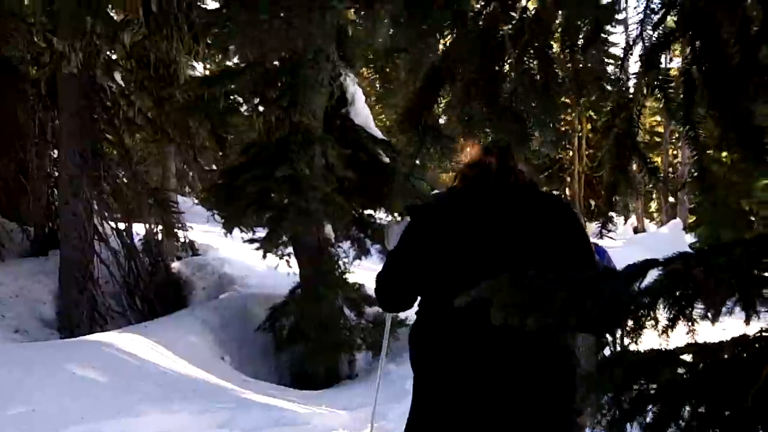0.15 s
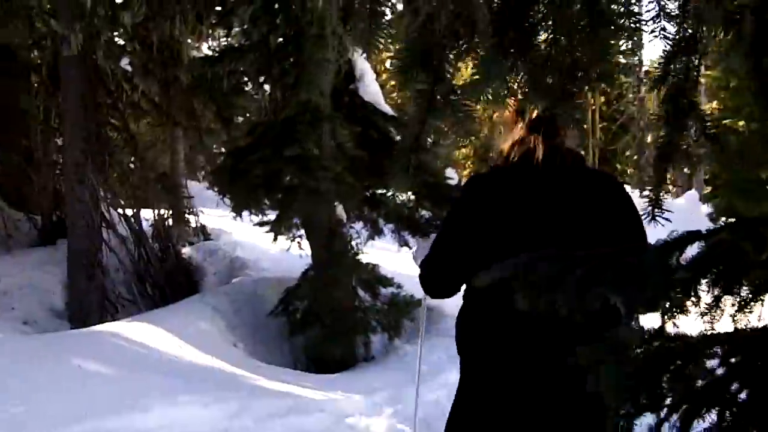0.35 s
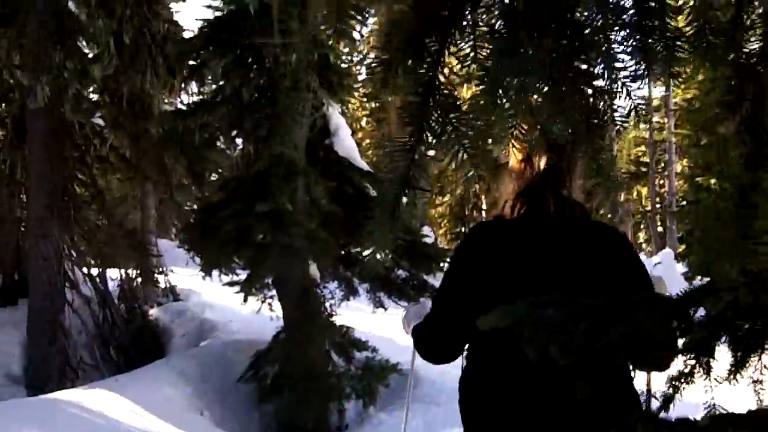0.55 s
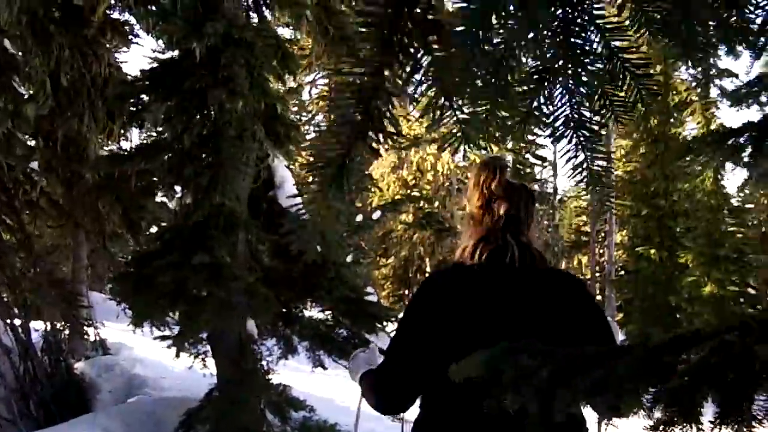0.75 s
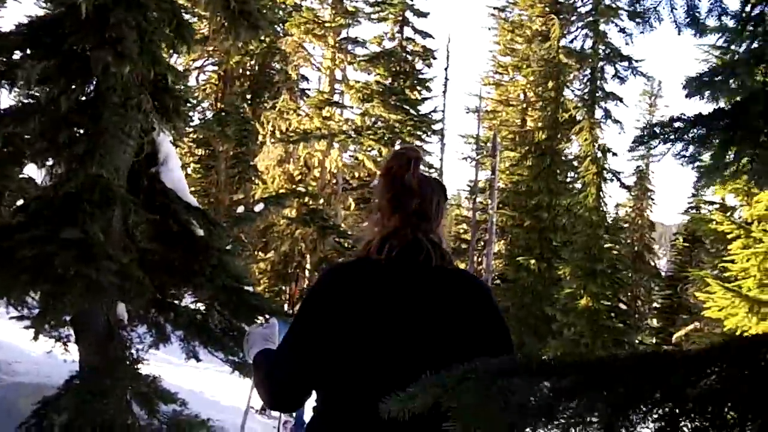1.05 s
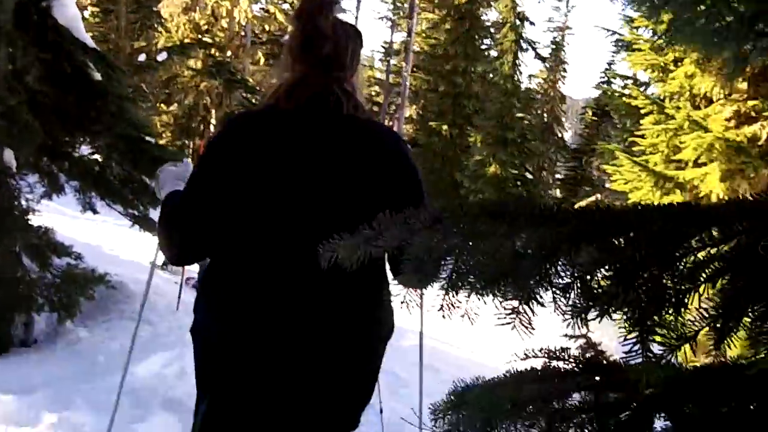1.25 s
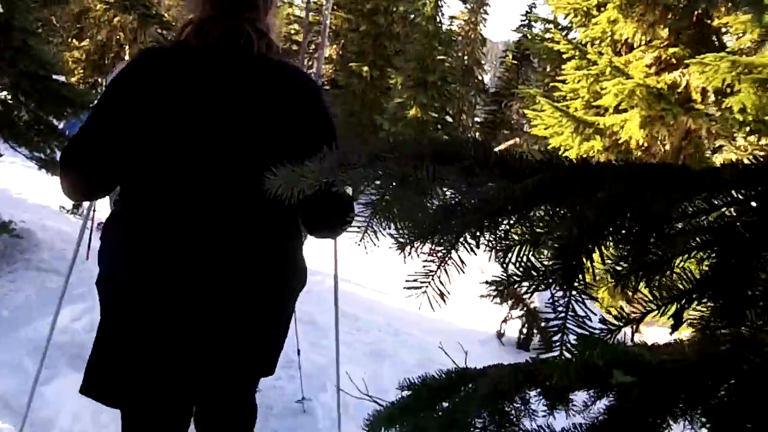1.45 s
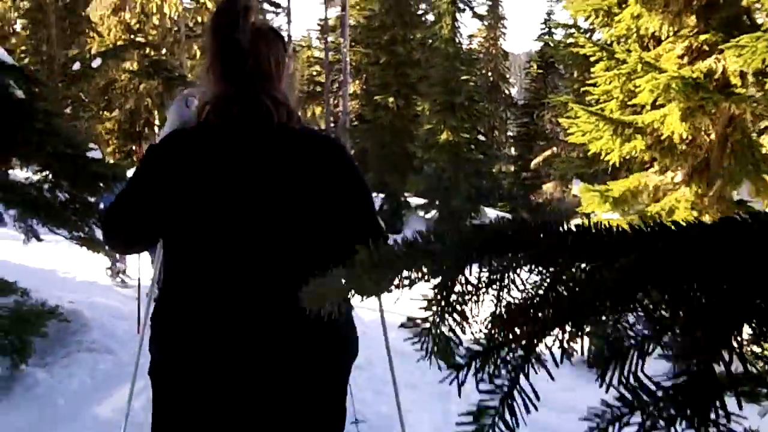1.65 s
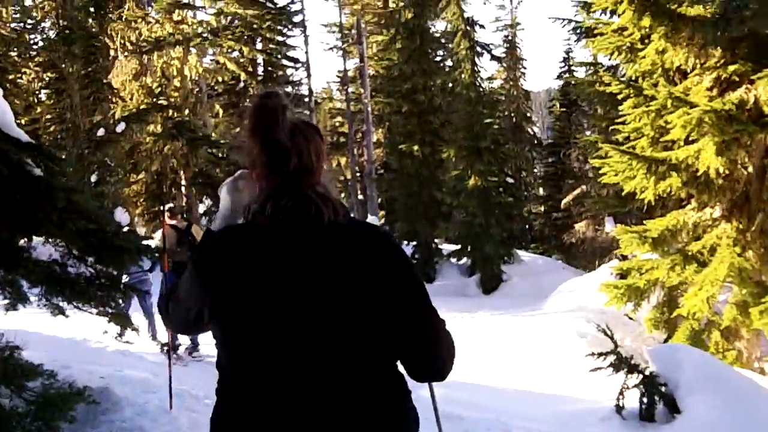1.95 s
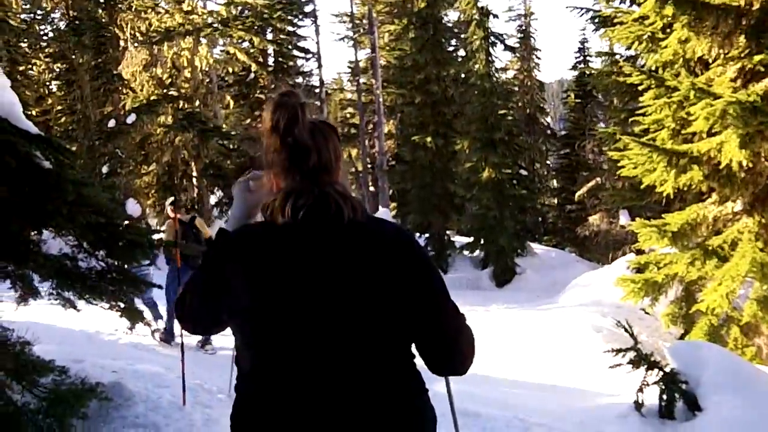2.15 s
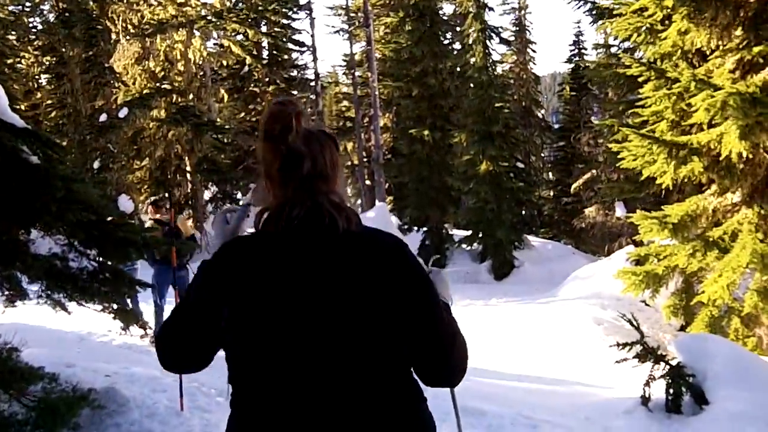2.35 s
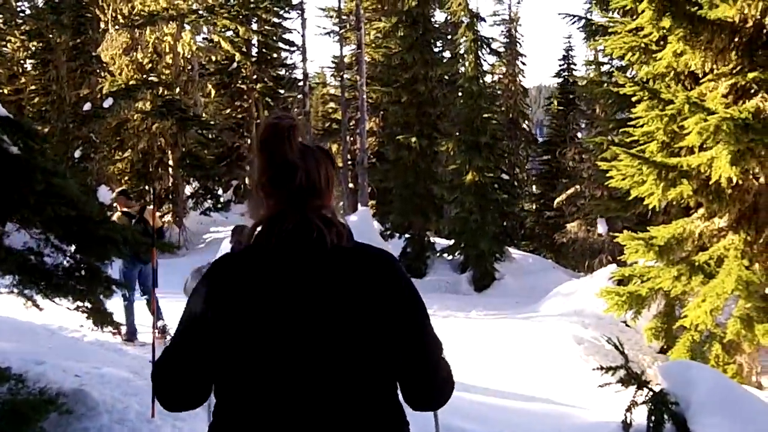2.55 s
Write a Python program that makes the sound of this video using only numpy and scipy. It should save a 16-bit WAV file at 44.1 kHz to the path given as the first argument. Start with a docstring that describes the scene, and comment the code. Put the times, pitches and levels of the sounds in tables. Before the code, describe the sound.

Snowshoes crunching quickly over crusty packed snow, crisp icy crackles with one early pole click

```python
"""Snowshoes crunch along a packed forest trail, close to a hand-held microphone.
After a moment of silence: faint air rumble, crust crunching push by push (swarms of noise bursts plus
ice ticks) and duller packing snow below. Pitched snaps (shaped noise) and dull deck knocks (struck
modes) soon join; then a thin swish, one pole click (tick plus modes), and creaks (trains of slips)."""
import sys
import numpy as np
from scipy import signal
from scipy.fft import rfft, irfft
from scipy.io import wavfile

SR = 44100
rng = np.random.default_rng(int(sys.argv[2]) if len(sys.argv) > 2 else 0)


def output_pcm(signal):
    """Save a mono or channel-first signal as 16-bit PCM at the path in sys.argv[1].

    Samples are clipped to [-1, 1] before scaling.
    """
    pcm = np.clip(np.atleast_2d(signal).T, -1, 1) * 32767
    wavfile.write(sys.argv[1], SR, np.round(pcm).astype(np.int16))


N = 119511

# spectrum of air on the microphone: [f/Hz, level/dB]
RUMBLE_SPECTRUM = [(20, -6), (100, -24), (300, -11), (1000, -29)]
RUMBLE_DB = -47.5

# pushes of a snowshoe through the crust: [start/s, length/s, first level/dB, last level/dB, extra treble/dB]
PUSHES = [(0.064, 0.048, -21.5, -20, -2.5), (0.157, 0.051, -24, -15, -0.5), (0.221, 0.16, -18, -18.5, -6.5),
          (0.372, 0.027, -21, -17.5, -13), (0.445, 0.024, -14, -19, -10.5), (0.483, 0.13, -24.5, -21.5, 1),
          (0.633, 0.088, -24, -19, -2), (0.764, 0.13, -24.5, -22.5, 5), (0.89, 0.14, -19.5, -19, -3),
          (1.037, 0.039, -19.5, -24.5, -8), (1.106, 0.11, -22, -29.5, -1.5),
          (1.188, 0.13, -29.5, -19.5, 0.5), (1.324, 0.033, -27, -30.5, 6), (1.412, 0.11, -21.5, -32, 2),
          (1.518, 0.055, -18.5, -19, 1.5), (1.596, 0.1, -22, -20.5, 5.5), (1.69, 0.18, -22.5, -29, -0.5),
          (1.881, 0.087, -23, -20.5, 0), (1.978, 0.057, -21.5, -19.5, -3.5), (2.052, 0.16, -22, -20.5, 1),
          (2.214, 0.13, -18.5, -21.5, -0.5), (2.351, 0.078, -20, -28.5, -4), (2.431, 0.22, -28.5, -23, -3),
          (2.671, 0.047, -21, -25.5, 5.5)]
# spectrum of breaking crust: [f/Hz, level/dB]
CRUST_SPECTRUM = [(300, -20), (1400, -9.5), (2400, 0.5), (3300, 2), (4500, -4.5), (6000, -10),
                  (7000, -15.5), (7900, -42), (9300, -30), (10200, -38), (13000, -30), (16000, -50)]
FRACTURES_PER_S, FRACTURE_DECAY_S, FRACTURE_SPREAD_DB, POWDER_DB = 280, 0.0032, -4.5 + 6.0, -4.5
FRACTURE_RISE_S, COLOUR_SPREAD_DB = 0.0008, 3.8  # shared with packing
CRACKLES_PER_S, CRACKLE_DB = 150, -9  # level re fracture swarm, before colouring
TREBLE_HZ, FAR_CRUST_DB = 4600, -31.5
ATTACK_S, RELEASE_S = 0.0073, 0.014

# snow packing under the weight: [start/s, length/s, first level/dB, last level/dB]
PACKS = [(.07, 0.054, -34, -37), (.175, 0.091, -31.5, -26), (.28, 0.067, -43, -23),
         (.452, 0.011, -37, -27.5), (.535, 0.061, -30, -28), (.645, 0.14, -28.5, -37),
         (.765, 0.29, -27.5, -24), (1.2, 0.14, -38, -33), (1.415, 0.067, -26.5, -33.5),
         (1.53, 0.298, -31.5, -28), (2.065, 0.35, -30.5, -30.5), (2.44, 0.15, -33.5, -32.5)]
# spectrum of packing snow: [f/Hz, level/dB]
PACKING_SPECTRUM = [(40, 2), (90, -12), (150, -4), (330, 0), (600, 4), (1800, 2.5), (3500, -31.5)]
PACK_GRAINS_PER_S, PACK_DECAY_S, PACK_SPREAD_DB, PACK_POWDER_DB = 220, 0.00093, 3.5, -5.5
FAR_PACK_DB, PACK_RELEASE_S = -37, 0.018

# larger pieces of crust snapping: [t/s, f/Hz, level/dB]
SNAPS = [(.1243, 3400, -10), (.274, 3100, -10), (.4635, 1900, -13), (.6467, 3000, -13), (.7702, 1750, -14),
         (.7987, 3100, -13), (1.0735, 1500, -15), (1.1128, 2900, -8.5), (1.1165, 2300, -8),
         (1.1175, 3600, -10.5), (1.2125, 2700, -16), (1.222, 2600, -16), (1.422, 2540, -11),
         (1.4368, 2900, -13.5), (1.469, 2240, -12), (1.4914, 2500, -15), (1.511, 3000, -13),
         (1.609, 2640, -10), (1.7352, 3500, -17), (1.758, 1300, -16), (1.8321, 2500, -17),
         (1.9299, 2780, -14.5), (2.0505, 3200, -11), (2.0995, 2500, -12), (2.1234, 3150, -10.5),
         (2.1474, 3040, -12.5), (2.2202, 2600, -13), (2.2322, 2780, -8), (2.311, 3000, -11),
         (2.4402, 3300, -16), (2.6645, 3100, -10.5), (2.6891, 3200, -14)]
SNAP_RISE_S, SNAP_DECAY_S, SNAP_WIDTH = 0.001, 0.0015, 0.55  # width as share of pitch

# dull knocks of a snowshoe deck: [t/s, f/Hz, level/dB, t60/s]
KNOCKS = [(0.126, 740, -29.5, 0.0053), (1.1204, 670, -15.5, 0.0039), (2.0558, 377, -28.5, 0.022),
          (2.332, 188, -38, 0.013), (2.557, 213, -41, 0.013)]
# modes of the deck: [multiple of pitch, level re knock/dB]
DECK_MODES = [(1., 20.5), (1.55, 12.5), (2.6, 12.5)]
KNOCK_CUT = 0.59  # the deck radiates little below this share of its pitch

# thin swishes of fabric or fir needles: [start/s, length/s, first level/dB, last level/dB]
SWISHES = [(.362, 0.039, -40, -36.5), (.768, 0.027, -34, -39.5), (1.295, 0.018, -55, -42)]
# spectrum of a swish: [f/Hz, level/dB]
SWISH_SPECTRUM = [(3000, -22), (7000, -7), (9200, 1), (11000, -12), (13000, -6), (16000, -12)]

# modes of a pole striking something hard: [f/Hz, level re POLE_DB/dB, t60/s]
POLE_MODES = [(940, 2, 0.011), (1340, -1, 0.02), (2060, 7.5, 0.0079), (2700, 6, 0.0087), (3660, 5, 0.005),
              (5000, -3, 0.0061)]
POLE_S, POLE_DB, POLE_TICK_DB, POLE_TICK_S = 0.4564, -8, -16.5, 0.0014

# creaks of compressed snow: [start/s, length/s, f/Hz, level/dB]
CREAKS = [(0.644, 0.027, 600, -27), (0.805, 0.035, 338, -27), (0.882, 0.079, 471, -27),
          (0.969, 0.07, 411, -30), (2.358, 0.018, 1360, -25)]
CREAK_SLIPS_PER_S, CREAK_T60_S, CREAK_WANDER = 130, 0.017, 0.11  # wander as share of pitch

START_S, NOTCH_HZ, TOP_HZ = 0.068, (7450, 8500), 15400


def undb(db):
    """Decibels to gain."""
    return 10 ** (np.asarray(db) / 20)


def unit(x):
    """Scale to rms 1."""
    return x / np.sqrt(np.mean(x ** 2) + 1e-18)


def add(out, start_s, x):
    """Mix x into out from start_s."""
    i = int(np.clip(start_s * SR, 0, N - 1))
    out[i:i + len(x)] += x[:N - i]


def colour(x, points):
    """Shape with a spectrum of (Hz, dB) points, interpolated over log frequency."""
    hz, db = np.array(points).T
    f = np.maximum(np.arange(N // 2 + 1) * SR / N, 1)
    gain = undb(np.interp(np.log(f), np.log(hz), db))
    return irfft(rfft(x) * gain, N)


def band(x, lo_hz, hi_hz, order=2):
    """Butterworth band-pass."""
    edges_hz = [lo_hz, min(hi_hz, SR / 2 - 100)]
    return signal.sosfilt(signal.butter(order, edges_hz, "band", fs=SR, output="sos"), x)


def ring(hz, t60_s):
    """One struck mode: a sine falling 60 dB in t60_s."""
    t = np.arange(int(t60_s * SR) + 2) / SR
    return np.sin(2 * np.pi * hz * t) * np.exp(-np.log(1000) * t / t60_s)


def effort(rows, rest_db, release_s=RELEASE_S):
    """Level over a run of pushes: each rises, slides from first to last level, dies away to a floor."""
    t = np.arange(N) / SR
    power = undb(rest_db) ** 2
    for start, length, first_db, last_db in rows:
        rise = np.clip((t - start) / ATTACK_S, 0, 1)
        fall = np.exp(-np.maximum(t - start - length, 0) / release_s)
        level = undb(np.interp(t, [start, start + length], [first_db, last_db]))
        power = power + (rise * fall * level) ** 2
    return np.sqrt(power)


def air():
    """Faint rumble of air on the microphone: coloured noise."""
    return undb(RUMBLE_DB) * unit(colour(rng.standard_normal(N), RUMBLE_SPECTRUM))


def fractures(per_s, decay_s, spread_db, powder_db):
    """A swarm of brief bursts, each with its own size and colour, over the fine hiss of powder."""
    edges_hz = np.geomspace(60, 17000, 34)
    noise = rng.standard_normal((len(edges_hz) - 1, N))
    # per burst: one draw per band for colour, then size, then timing
    chance = np.clip(rng.standard_normal((3000, len(edges_hz) + 1)), -1.7, 1.7)
    at = ((np.arange(len(chance)) + 2 * chance[:, -1]) / per_s * SR).astype(int)
    heard = (at >= 0) & (at < N)
    out = np.zeros(N)
    for k, hiss in enumerate(noise):
        size = undb(spread_db * chance[heard, -2] + COLOUR_SPREAD_DB * chance[heard, k])
        power = np.bincount(at[heard], size ** 2, N)
        for slew_s in (FRACTURE_RISE_S, decay_s):
            power = signal.lfilter([1], [1, -np.exp(-2 / (slew_s * SR))], power)
        level = np.sqrt(power / power.mean() + undb(powder_db) ** 2)
        out += band(hiss * level, edges_hz[k], edges_hz[k + 1])
    return out


def crackles():
    """Single ice crystals give way at random, each with one dry tick."""
    breaks = rng.random(N) < CRACKLES_PER_S / SR
    return unit(breaks * rng.uniform(-1.18, 1, N)) * undb(CRACKLE_DB)


def crust():
    """Bright crunch of the icy surface, treble set per push; walkers further off fill the gaps."""
    swarm = unit(fractures(FRACTURES_PER_S, FRACTURE_DECAY_S, FRACTURE_SPREAD_DB, POWDER_DB))
    grains = unit(colour(swarm + crackles(), CRUST_SPECTRUM))
    treble = signal.sosfiltfilt(signal.butter(2, TREBLE_HZ, "high", fs=SR, output="sos"), grains)
    body = grains - treble
    body_rows = [(s, length, first, last) for s, length, first, last, _ in PUSHES]
    treble_rows = [(s, length, first + extra, last + extra) for s, length, first, last, extra in PUSHES]
    return body * effort(body_rows, FAR_CRUST_DB) + treble * effort(treble_rows, FAR_CRUST_DB)


def packing():
    """Duller crunch of snow giving way below the crust: a swarm of shorter bursts."""
    grains = fractures(PACK_GRAINS_PER_S, PACK_DECAY_S, PACK_SPREAD_DB, PACK_POWDER_DB)
    return unit(colour(grains, PACKING_SPECTRUM)) * effort(PACKS, FAR_PACK_DB, PACK_RELEASE_S)


def snaps():
    """Single pieces of crust break with a short, pitched crack: band-passed noise bursts."""
    out, t = np.zeros(N), np.arange(1024) / SR
    shape = np.minimum(t / SNAP_RISE_S, 1) * np.exp(-t / SNAP_DECAY_S)
    spread = 1 + SNAP_WIDTH / 2
    energy_scale = np.sqrt(SNAP_DECAY_S * SR / len(t))
    for start, hz, db in SNAPS:
        crack = band(rng.standard_normal(len(t)) * shape, hz / spread, hz * spread, order=3)
        add(out, start, unit(crack) * energy_scale * undb(db))
    return out


def knocks():
    """A snowshoe deck knocks dully as it lands or flaps: a few damped modes."""
    out = np.zeros(N)
    for start, hz, db, t60_s in KNOCKS:
        blow = np.zeros(N)
        for multiple, mode_db in DECK_MODES:
            add(blow, start, undb(db + mode_db) * ring(hz * multiple, t60_s))
        out += band(blow, hz * KNOCK_CUT, 4000)
    return out


def swishes():
    """Brief, thin brushing high in the treble: coloured noise."""
    return unit(colour(rng.standard_normal(N), SWISH_SPECTRUM)) * effort(SWISHES, -90)


def pole():
    """One sharp click: a noise tick of contact and a short ring of modes in alternating polarity."""
    out, t = np.zeros(N), np.arange(512) / SR
    for k, (hz, db, t60_s) in enumerate(POLE_MODES):
        add(out, POLE_S, (-1) ** k * undb(POLE_DB + db) * ring(hz, t60_s))
    tick = rng.standard_normal(len(t)) * np.exp(-t / POLE_TICK_S)
    add(out, POLE_S, undb(POLE_TICK_DB) * tick)
    return out


def creaks():
    """Packed snow sticks and slips; every slip rings briefly near one pitch."""
    out = np.zeros(N)
    for start, length, hz, db in CREAKS:
        slips = np.zeros(N)
        for k, (late, pitch, size) in enumerate(rng.uniform(-0.91, 1, (24, 3))):
            when = (k + (1 + late) / 2) / CREAK_SLIPS_PER_S
            if when < length:
                slip = ring(hz * (1 + CREAK_WANDER * pitch), CREAK_T60_S)
                add(slips, start + when, (1 + size / 2) * slip)
        creak = unit(band(slips, hz / np.sqrt(2), 2 * hz))
        out += creak * np.sqrt(length * SR / N) * undb(db)  # level holds over the creak's length
    return out


def scene():
    """Sum of all layers, one channel."""
    return (air() + crust() + packing() + snaps() + knocks() + swishes() + pole() + creaks())[None]


def record(dry):
    """The recorder has a treble notch, clips at full scale, opens after a moment and cuts the top."""
    x = signal.sosfilt(signal.butter(3, NOTCH_HZ, "bandstop", fs=SR, output="sos"), dry)
    is_open = np.arange(N) / SR > START_S
    x = np.clip(x, -1, 1) * is_open
    return signal.sosfilt(signal.ellip(8, 0.2, 70, TOP_HZ, fs=SR, output="sos"), x)


dry = scene()
out = record(dry)
output_pcm(out)
```